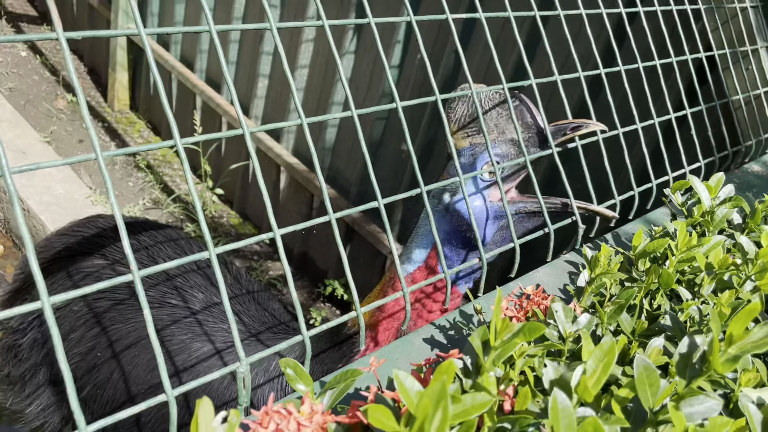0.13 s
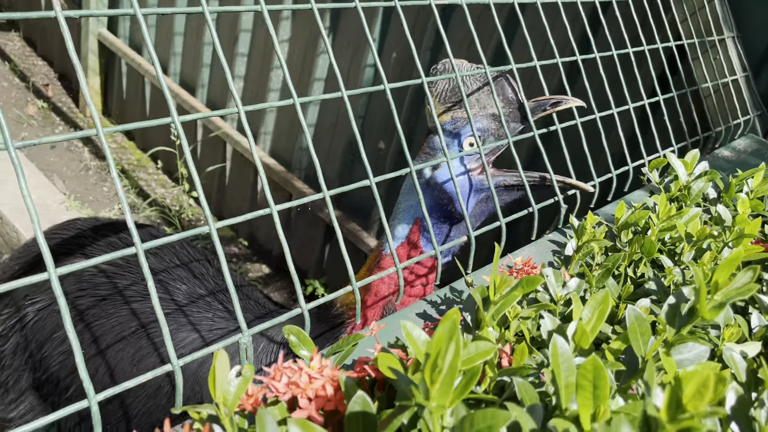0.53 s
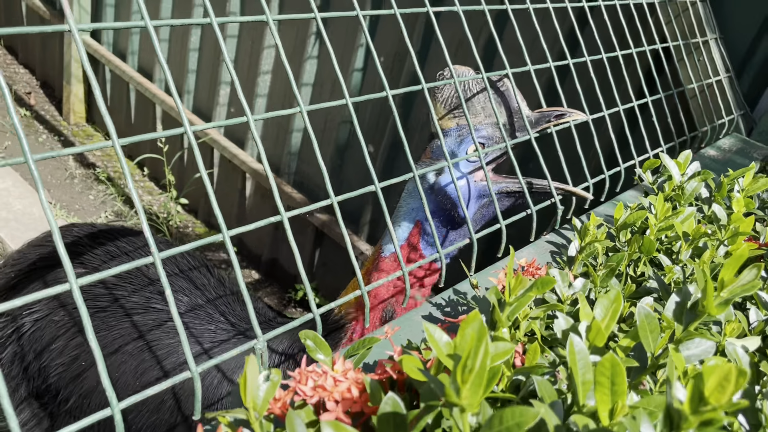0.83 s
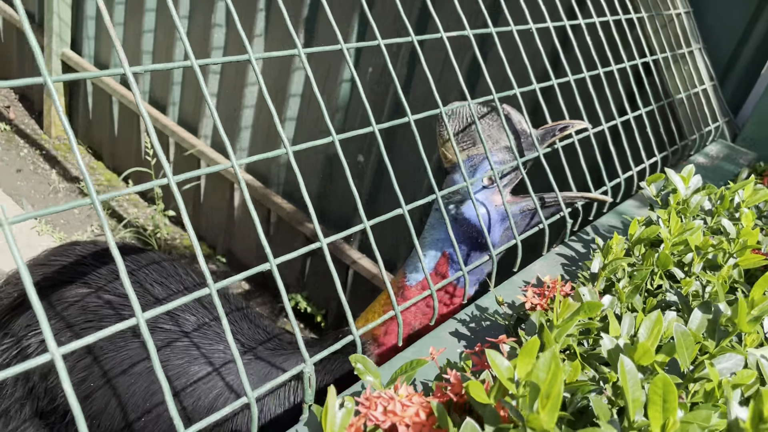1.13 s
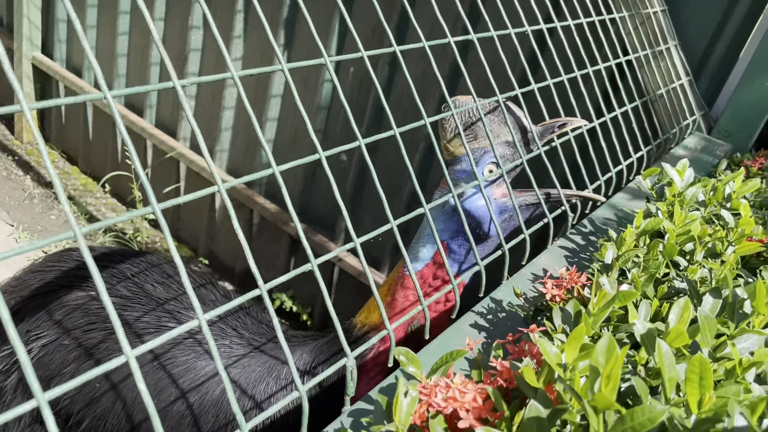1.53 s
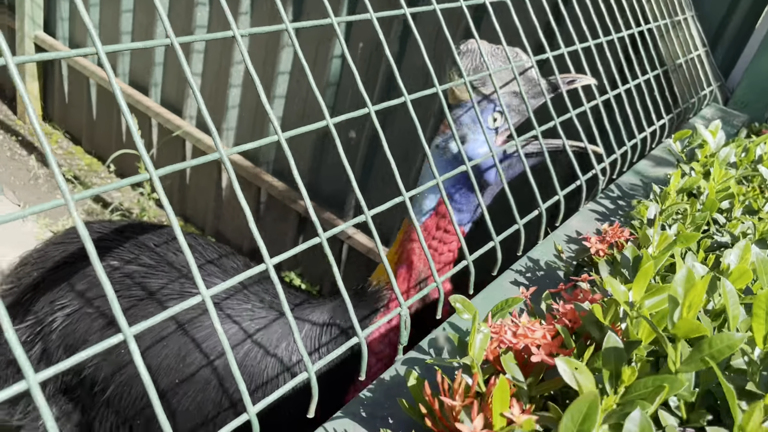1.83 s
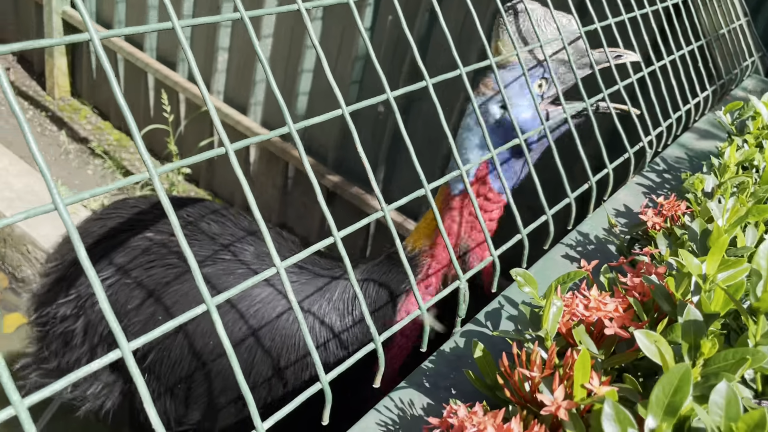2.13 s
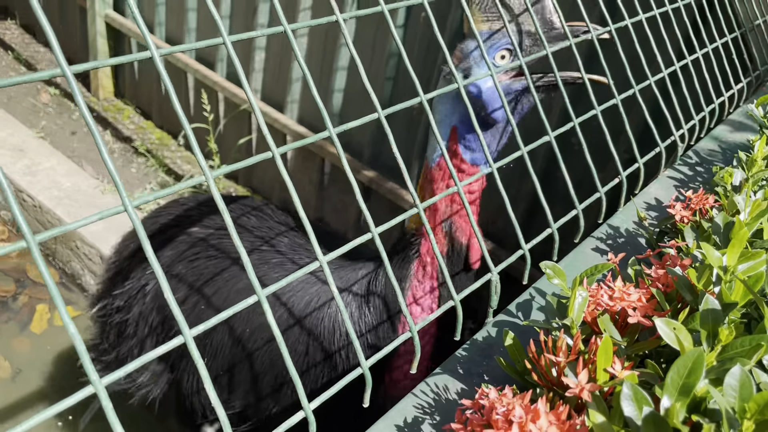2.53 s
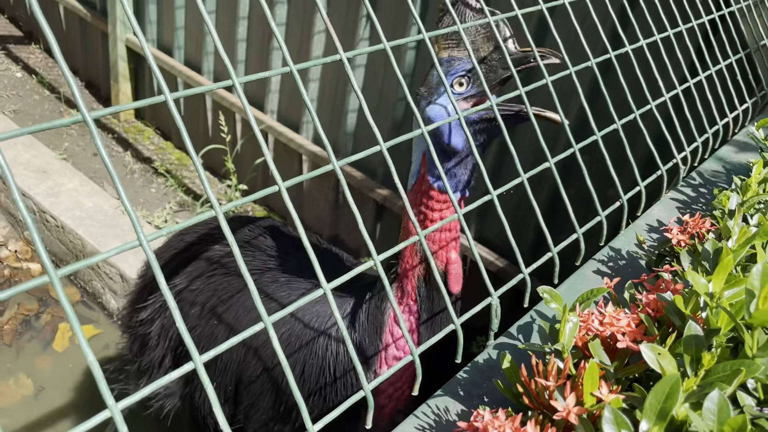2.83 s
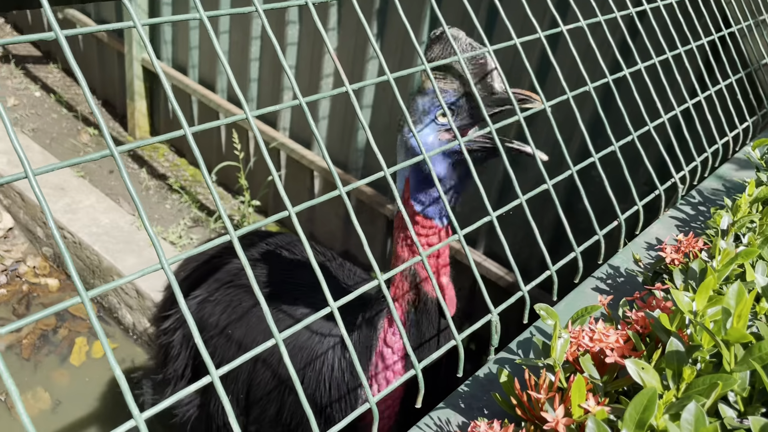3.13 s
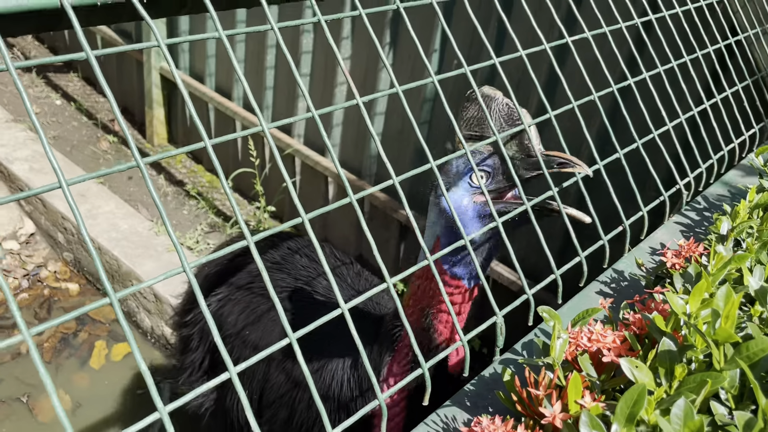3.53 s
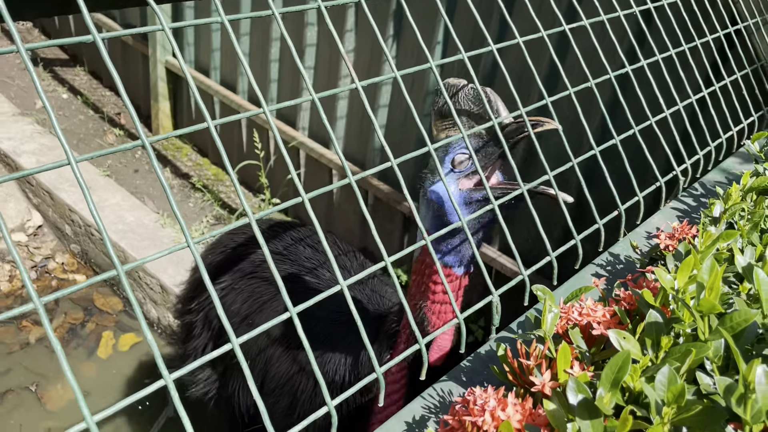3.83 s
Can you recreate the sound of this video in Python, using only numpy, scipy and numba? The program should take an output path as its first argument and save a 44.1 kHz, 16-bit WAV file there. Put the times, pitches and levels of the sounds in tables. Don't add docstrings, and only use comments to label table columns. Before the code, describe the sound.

A large flightless bird a metre away brays nine times, starting near 0.1, 0.55, 1.0, 1.5, 1.9, 2.4, 2.9, 3.35 and 3.8 s. Each has a chesty thump, two throat flaps, then a brief buzzing, hollow honk with breathy hiss. Soft gulps fall between; after 2.25 s the resonance changes. A chirp ends at the start; dull wall echo, distant rumble, leaves and faint insects remain.

```python
import sys
import numpy as np
from scipy import signal
from scipy.fft import rfft, irfft, next_fast_len
from scipy.io import wavfile
from scipy.ndimage import uniform_filter1d
from numba import njit

SR = 44100
rng = np.random.default_rng(int(sys.argv[2]) if len(sys.argv) > 2 else 0)


def unload_wav(signal):
    wavfile.write(
        sys.argv[1],
        SR,
        np.round(np.clip(np.atleast_2d(signal).T, -1, 1) * 32767).astype(np.int16),
    )


def invert_db(level):
    return 10 ** (np.asarray(level, dtype=float) / 20)


N = 176400
T = np.arange(N) / SR

# f/Hz, level/dB
GARDEN = [(30, -4), (60, 12), (110, 0), (250, -3.5), (470, -6), (1200, -23.5), (5200, -37), (15000, -51.5)]
# f/Hz, level/dB
GARDEN_SIDE = [(100, -10.5), (1000, 5.5), (6000, 0.5), (13000, -9.0)]
# f/Hz, width/Hz, level/dB
INSECTS = [(3430, 560, -2.5), (4780, 220, -8.5), (6900, 1200, 1.9)]
INSECT_LEVELS = [-73, -72, -65.5, -64, -72.5, -58.5, -70.5, -65, -59.5]
GARDEN_DB, FLICKER_DB = -43.5, 1.5
CHIRP_HZ, CHIRP_DB, CHIRP_END_S = 1560, -54, .07

WALL_T60_S, WALL_DB, WALL_HZ = 0.39, -26, 1410

# f/Hz, level/dB
GULP_SPECTRUM = [(200, 7.5), (450, 5), (900, -28), (1600, 7.5), (2500, -4.5), (3600, -4), (6200, -26),
                 (14000, -22)]
GULP_S, GULP_LEAD_S, GULP_RING_DB, GULP_HUM_DB = 0.071, 0.11, 1, -42

# puff level/dB, puff f/Hz, hum level/dB, level/dB of the gulp before it
CHEST = [(-19.5, 115.5, -21, -53), (-19, 121.5, -22.5, -55), (-20.5, 114, -24.5, -53.5),
         (-20, 112, -22, -48), (-22.5, 106, -26, -58), (-20.5, 95, -38, -62.5), (-21, 120, -25.5, -62),
         (-19, 110, -21, -52), (-18.5, 116, -24, -48.5)]
PUFF_S, FLAP_PUFF_DB, PUFF_DROP = 0.0099, -5.5, .3

# t/s, peak level/dB, length/s, hiss level/dB
FLAPS = [(0.115, -6, 0.011, -16.5), (0.153, -4.5, 0.024, -13.5), (0.551, -8, 0.02, -11.5),
         (0.588, -4.5, 0.0034, -9.5), (0.994, -4, 0.024, -17), (1.032, -5, 0.02, -17),
         (1.468, -3.5, 0.014, -16), (1.507, -4.5, 0.015, -14), (1.88, -4, 0.015, -14),
         (1.92, -4, 0.018, -23), (2.424, -3, 0.016, -19.5), (2.462, -4.5, 0.012, -17.5),
         (2.864, -7.5, 0.021, -8.5), (2.9, -7, 0.0027, -6.5), (3.351, 1, 0.015, -13),
         (3.392, -3.5, 0.02, -9.5), (3.799, -3.5, 0.019, -13), (3.835, -1.5, 0.018, -16)]
# delay/s, level/dB, dullness/0-1
FLAP_PULSES = [
    [(-.015, -12.5, 0.9), (0, -3.3, 1), (.005, 0, 0.77), (.014, -12, 0.9)],
    [(0, -0.4, 0.11), (.005, -11.5, 0.9), (.009, -22, 0), (.014, -7.5, 0)],
]
FLAP_DB, PREFLAP_S, PREFLAP_DB = -9, 0.023, -14

# start t/s, end t/s, level/dB, first pulses level/dB, hiss level/dB
BRAYS = [(0.19, 0.311, -14.5, 1.5, -22.5), (.617, 0.739, -14.5, -2, -22.5), (1.065, 1.188, -15, 1, -22),
         (1.536, 1.66, -14.5, 2.5, -23.5), (1.95, 2.063, -14, 0, -20.5), (2.492, 2.65, -13, 0.5, -21.5),
         (2.928, 3.051, -11.5, 1.5, -19.5), (3.416, 3.548, -12, -2, -17.5),
         (3.863, 4.001, -12.5, -2, -16.5)]
# held f/Hz, final f/Hz
PITCHES = [(123.5, 110), (125.8, 110), (126, 108), (124.6, 110), (127.2, 110), (129, 113), (123, 92),
           (125.3, 100), (127.8, 130)]
START_HZ, RISE_S, SAG_S = 100.04, .014, .045
ATTACK_S, RELEASE_S = 0.00026, 0.012
JITTER, SHIMMER_DB, ALTERNATE_DB, EXTRA_DB = .025, 1.3, -1.34, -14
# t/s, level/dB, half length/s
SURGES = [
    (0.235, 1.5, 0.0052),
    (2.943, 6.5, 0.0053),
    (3.462, 2, 0.039),
    (3.892, 1, 0.045),
    (.68, 2, 0.031),
    (1.556, 2.5, .01),
    (2.624, 0, .02),
    (3.023, 1, 0.025),
]

# tuning factor at start, at end, brightest point/share of length,
# leak before the first flap level/dB
NECK = [(1.01, .96, 0.57, -3), (1.01, 1, 0.66, -1), (1.01, 0.95, 0.55, -4), (1.01, 0.95, 0.57, -5),
        (1.02, 0.94, 0.65, -9), (1.01, 0.96, 0.67, 1), (1.01, .97, .75, -2), (1.01, 0.97, 0.68, -9),
        (1.01, 1, 0.65, -3)]
# f/Hz, width/Hz, level/dB
BENT = [(276, 83, -21), (419.5, 47.4, -0.5), (520.7, 42, 1), (711.4, 27.5, -1.5), (952.4, 50, -8),
        (1201, 34, -7), (1431, 31.5, -10.5), (1648, 44, -8), (1854, 49, -13), (2037, 100, -16),
        (2640, 120, -41), (3700, 73, -30.5), (4050, 290, -30)]
# f/Hz, width/Hz, level/dB
RAISED = [(265, 44, -17.5), (354, 56.6, -4.5), (464.4, 91, 1), (564, 102.5, -0.5), (783, 38, -6.5),
          (991, 44, -6.5), (1229, 52, -10), (1404, 38, -10.5), (1725, 91, -19.5), (1990, 47, -27.5),
          (2480, 57, -26.5), (3610, 140, -20), (5730, 1400, -31)]
RAISE_S = 2.25
VOICE_DB, ROUGH, LOW_ROUGH, CLUMP_DB = 0.5, .18, .35, 2
DULL_DB, BRIGHT_HZ, TILT, TILT_HZ = -5, 850, 1, 666
SNAP_HZ, SNAP_WIDTH_HZ, SNAP_DB = 2100, 900, -30
SAC_HZ, SAC_WIDTH_HZ, SAC_DB, SAC_ROUGH = 167, 119, -19.5, 2.64
VOICE_TOP_HZ = 4260

# f/Hz, level/dB
BREATH = [(300, 22.5), (1500, 6.5), (2500, -1), (3900, -1.5), (6000, -12.5), (8500, 0.5), (13500, -24.5),
          (15600, -15.5)]
THUMP_DB, THUMP_HZ, HISS_EFFORT = -5.5, 51, 0.17
TUBE_S, TUBE_ECHO, BEAK_HZ = .0042, .5, 1000

# f/Hz, phase/rad
PORT_PHASE = [(100, 0), (800, .3), (1700, -.5), (3000, 0), (5000, 0), (7600, -2.6), (9900, -3.6),
              (11500, -5.6), (13000, -6.2)]
# f/Hz, level/dB
PORT_BALANCE = [(60, -1.8), (380, -2.7), (700, -2.2), (1290, .9), (2380, -.6), (4400, -3.2), (8120, -.1),
                (15000, 0.1)]
# f/Hz, level/dB
PORT_UNSHARED = [(100, -53), (350, -17.5), (700, -14), (1500, -11), (3000, -11.5), (5000, -8), (8500, -21),
                 (14000, -6)]
MIC_LOW_HZ, MIC_TOP_HZ = 46, 15500


def unit(x):
    return x / np.sqrt(np.mean(x ** 2))


def noise():
    return rng.standard_normal(N)


def shape(table):
    f = np.fft.rfftfreq(N, 1 / SR) + 1
    hz, value = np.transpose(table)
    return np.interp(np.log(f), np.log(hz + 1), value)


def through(x, response):
    size = next_fast_len(N + 8192, real=True)
    bins = np.arange(size // 2 + 1) * N / size
    wide = np.interp(bins, np.arange(len(response)), response)
    return irfft(rfft(x, size) * wide, size)[:N]


def colour(x, table):
    return through(x, invert_db(shape(table)))


def ring(x, hz, width):
    return signal.lfilter(*signal.iirpeak(hz, hz / width, fs=SR), x)


def walk(rate):
    k = int(SR / rate)
    steps = np.repeat(rng.standard_normal(N // k + 1), k)
    return unit(uniform_filter1d(uniform_filter1d(steps, k), k)[:N])


def gate(start, end, attack, release):
    return np.clip((T - start) / attack, 0, 1) * np.exp(-np.clip((T - end) / release, 0, 40))


def garden():
    mid, side = (colour(noise() * invert_db(FLICKER_DB * walk(6)), GARDEN) for _ in range(2))
    side = colour(side, GARDEN_SIDE)
    scale = invert_db(GARDEN_DB) / np.sqrt(np.mean(mid ** 2))
    bugs = sum(invert_db(db + 2 * FLICKER_DB * walk(26.05)) * unit(ring(noise(), hz, width))
               for hz, width, db in INSECTS)
    pauses = [row[0] - .15 for row in FLAPS[::2]]
    bugs = bugs * invert_db(np.interp(T, pauses, INSECT_LEVELS))
    chirp = invert_db(CHIRP_DB) * gate(-1.4, CHIRP_END_S, 1, .012) * unit(ring(noise(), CHIRP_HZ, 40.))
    return ports(scale * mid + chirp + bugs) + scale * side * np.array([[1], [-1]])


def wall(x):
    t = T[:SR // 2]
    decay = np.exp(-np.log(1000) * t / WALL_T60_S) * (t > .004)
    mid, side = rng.standard_normal((2, len(t))) * decay
    tail = mid + .5 * np.diff(side, prepend=0) * np.array([[1], [-1]])
    tail = signal.lfilter(*signal.butter(1, WALL_HZ, fs=SR), tail)
    tail = tail / np.sqrt(np.sum(tail[0] ** 2))
    return invert_db(WALL_DB) * signal.fftconvolve(x[None], tail, axes=1)[:, :N]


def gulp_flow():
    return sum(invert_db(c[3]) * np.exp(-((T - FLAPS[2 * k][0] + GULP_LEAD_S) / GULP_S) ** 2)
               for k, c in enumerate(CHEST))


def chest_puffs(k):
    puff_db, puff_hz = CHEST[k][:2]
    out = np.zeros(N)
    for j in range(2):
        v = np.clip(T - FLAPS[2 * k + j][0] + 0.00745, 0, None)
        wave = np.sin(2 * np.pi * puff_hz * v * (1 - PUFF_DROP * np.clip(v / 0.046, 0, .5)))
        swell = v / PUFF_S * np.exp(-np.clip(v / PUFF_S, 0, 40))
        out += 5 * invert_db(puff_db + j * FLAP_PUFF_DB) * swell * wave
    return out


def flap(k):
    t0, db, length, hiss_db = FLAPS[k]
    pulses = np.zeros(N)
    for late, rel_db, dull in FLAP_PULSES[k % 2]:
        a, b = rng.standard_normal(2)
        push = np.hanning(3 + int(np.clip(dull, 0, 1) * 60))
        at = int(SR * (t0 + late * (1 + 0.124 * a)))
        level = invert_db(db + FLAP_DB + rel_db + 4.6 * b * (late != 0))
        pulses[at:at + len(push)] += level * push / push.sum()
    leak = gate(t0 - 0.003, t0 + length, 0.0032, 0.0091)
    if k % 2 == 0:
        leak = leak + invert_db(PREFLAP_DB + NECK[k // 2][3]) * gate(t0 - PREFLAP_S, t0, 0.002, 0.0036)
    return pulses, invert_db(db + FLAP_DB + hiss_db) * leak


def held_bray(k):
    t0, t1, db, first_db, hiss_db = BRAYS[k]
    held, last = PITCHES[k]
    pitch = held - (held - START_HZ) * np.exp(-np.clip(T - t0, 0, None) / RISE_S)
    pitch -= (held - last) * np.exp(np.clip(T - t1, None, 0) / SAG_S)
    phase = np.cumsum(pitch * (T >= t0)) / SR

    beat = np.arange(40)
    c = rng.standard_normal((40, 4))
    at = np.searchsorted(phase, np.clip(beat + JITTER * c[:, 0] * (beat > 0), 1e-9, None))
    extra = at + ((.5 + 0.14 * c[:, 2]) * SR / 120).astype(int)
    size = invert_db(db + SHIMMER_DB * c[:, 1] + ALTERNATE_DB * (-1) ** beat + first_db * (beat < 3))
    env = gate(t0 - ATTACK_S, t1, ATTACK_S, RELEASE_S)
    pulses = np.zeros(N)
    for where, s in ((at, size), (extra, size * invert_db(EXTRA_DB) * c[:, 3])):
        ok = where < N
        np.add.at(pulses, where[ok], s[ok] * env[where[ok]])

    breath = 0.97 + 1.21 * np.exp(-(phase % 1) / 0.34)
    air = gate(t0 - 0.002, t1, 0.0032, 1.08 * RELEASE_S) * invert_db(db + hiss_db) * breath
    hum = 1.3 * invert_db(CHEST[k][2]) * gate(t0 + 0.024, t1, 0.0088, 2.25 * RELEASE_S)
    hum = hum * np.sin(2 * np.pi * phase)
    u = (T - t0) / (t1 - t0)
    effort = DULL_DB * (u > .04) * (u < 1.5) * np.clip(np.abs(u - NECK[k][2]) / .5, 0, 1.5)
    return pulses, air, hum, effort


def syrinx():
    pulses, air, chest, effort = np.zeros((4, N))
    for k in range(len(BRAYS)):
        p, a, hum, e = held_bray(k)
        pulses += p
        air += a
        chest += hum + chest_puffs(k)
        effort += e
    for k in range(len(FLAPS)):
        p, a = flap(k)
        pulses += p
        air += a
    pulses *= invert_db(sum(db * np.exp(-((T - s) / w) ** 2) for s, db, w in SURGES))
    return pulses, air, chest, effort


@njit
def slide(x, hz, k):
    y, b, l = np.empty(len(x)), 0., 0.
    for i in range(len(x)):
        g = np.pi * hz[i] / SR
        g += g * g * g / 3
        v = (b + g * (x[i] + 1e-18 - l)) / (1 + g * (g + k))
        b, l, y[i] = 2 * v - b, l + 2 * g * v, k * v
    return y


def pipe(low, high, tuning, effort, modes):
    out = np.zeros(len(low))
    for k, (hz, width, db) in enumerate(modes):
        source = high if hz > BRIGHT_HZ else low
        tilt = invert_db(TILT * effort * np.clip(np.log2(hz / TILT_HZ), 0, 1.6))
        out += (-1) ** k * invert_db(db) * slide(source * tilt, hz * tuning, width / hz)
    return out


def windpipe_voice(pulses, effort, gulps):
    tail = np.exp(-np.arange(300) / 118.0)
    rasp = ROUGH * 0.27 * signal.fftconvolve(np.abs(pulses), tail)[:N] * noise()
    bright = invert_db(effort + CLUMP_DB * walk(110))
    draw = invert_db(GULP_RING_DB) * 10 * gulps * noise()
    low, high = (150 * invert_db(VOICE_DB) * (pulses + share * rasp) + draw for share in (LOW_ROUGH, 1))
    high = high * bright
    times = [s for b in BRAYS for s in b[:2]]
    tuning = np.interp(T, times, [factor for n in NECK for factor in n[:2]])
    cut = int(RAISE_S * SR)
    voice = np.concatenate([pipe(low[s], high[s], tuning[s], effort[s], modes)
                            for s, modes in ((slice(cut), BENT), (slice(cut, N), RAISED))])
    voice = voice + invert_db(SNAP_DB) * ring(high, SNAP_HZ, SNAP_WIDTH_HZ)
    voice = voice + 150 * invert_db(SAC_DB) * ring(pulses + SAC_ROUGH * rasp, SAC_HZ, SAC_WIDTH_HZ)
    return signal.sosfilt(signal.butter(4, VOICE_TOP_HZ, fs=SR, output="sos"), voice)


def beak_hiss(air, effort):
    hiss = air * invert_db(HISS_EFFORT * effort + 3.37 * walk(150)) * unit(colour(noise(), BREATH))
    lag = int(TUBE_S * SR)
    hiss = signal.lfilter([1], np.r_[1, np.zeros(lag - 1), -TUBE_ECHO], hiss)
    return signal.lfilter(*signal.butter(2, BEAK_HZ, "high", fs=SR), hiss)


def bird():
    pulses, air, chest, effort = syrinx()
    gulps = gulp_flow()
    voice = windpipe_voice(pulses, effort, gulps)
    thump = invert_db(THUMP_DB) * uniform_filter1d(air, size=600) * unit(ring(noise(), THUMP_HZ, 33.0))
    hiss = beak_hiss(air, effort)
    gulps = gulps * invert_db(2.3 * walk(34)) * unit(colour(noise(), GULP_SPECTRUM))
    idle = invert_db(GULP_HUM_DB) * unit(ring(ring(noise(), 112.6, 40.0), 112.6, 40.0))
    return voice + 1.65 * hiss + gulps + chest + idle + thump


def ports(x):
    half = invert_db(shape(PORT_BALANCE) / 2) * np.exp(.5j * shape(PORT_PHASE))
    smear = rng.standard_normal(400) * np.exp(-np.arange(400) / 560.0)
    smear = smear / np.sqrt(np.sum(smear ** 2))
    loose = colour(signal.fftconvolve(x, smear)[:N], PORT_UNSHARED)
    return np.array([through(x, half) + loose, through(x, 1 / half) - loose])


def scene():
    x = bird()
    return ports(x) + wall(x) + garden()


def band_limit(x):
    return signal.sosfilt(signal.butter(12, 15600, fs=SR, output="sos"), x)


def record(dry):
    x = np.tanh(0.87 * dry) / 0.94
    x = signal.sosfilt(signal.butter(6, MIC_LOW_HZ, "high", fs=SR, output="sos"), x)
    x = signal.sosfilt(signal.ellip(8, .2, 70, MIC_TOP_HZ, fs=SR, output="sos"), x)
    return band_limit(x)


dry = scene()
out = record(dry)
unload_wav(out)
```